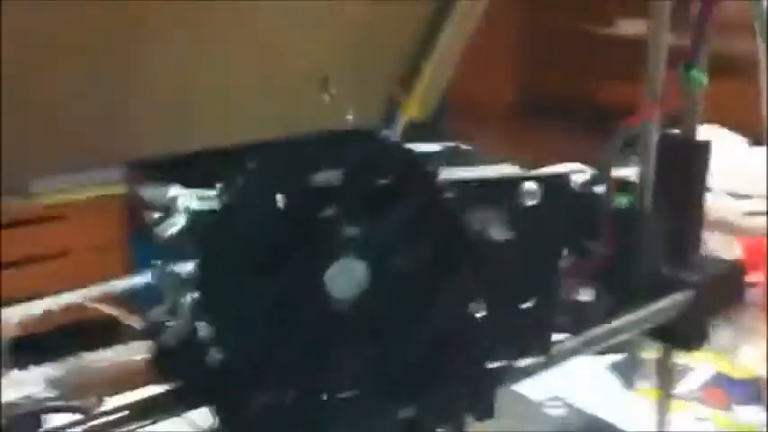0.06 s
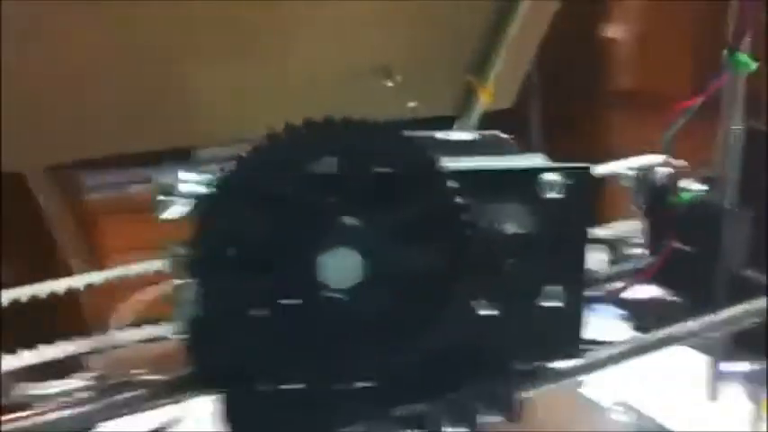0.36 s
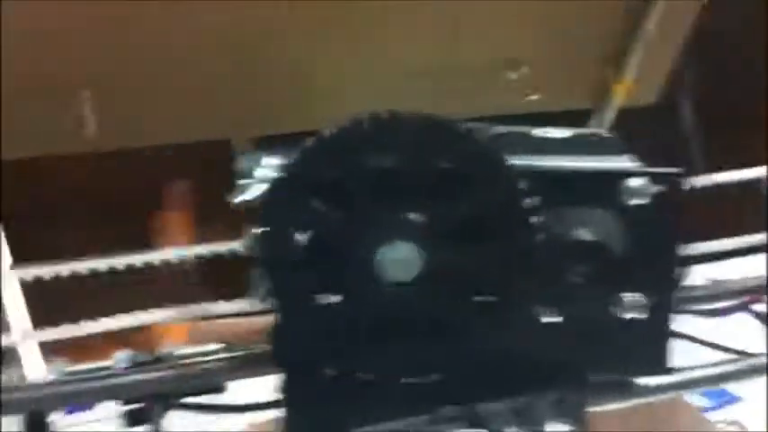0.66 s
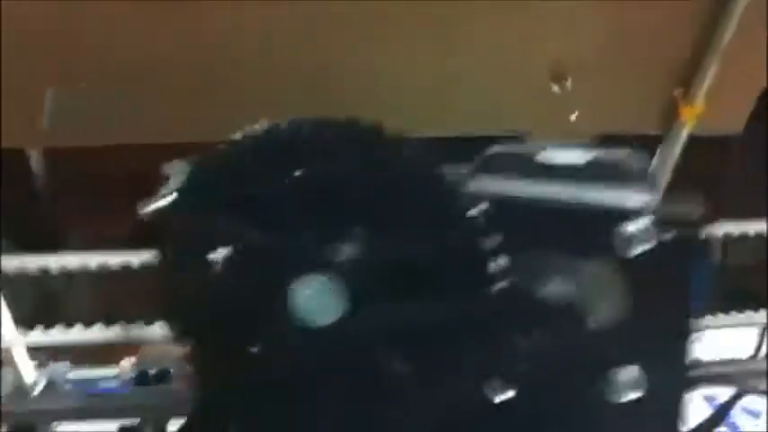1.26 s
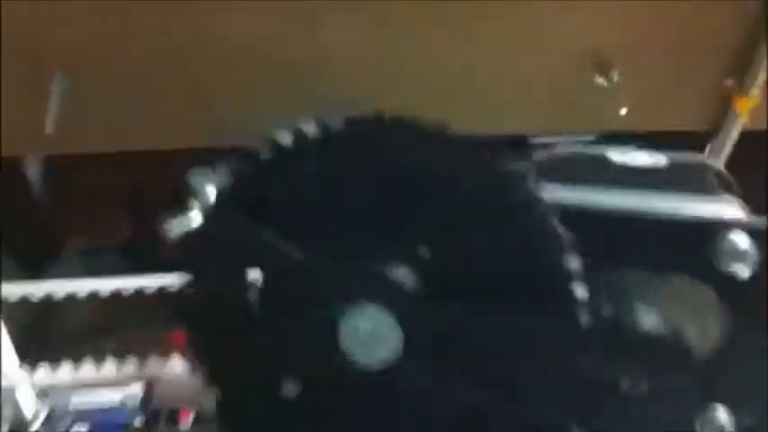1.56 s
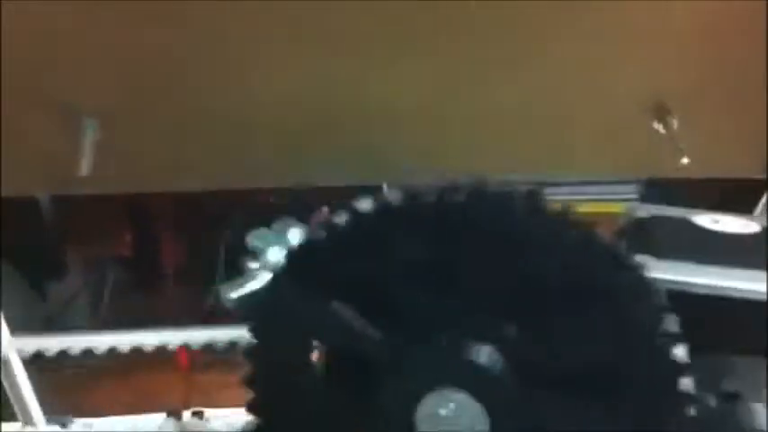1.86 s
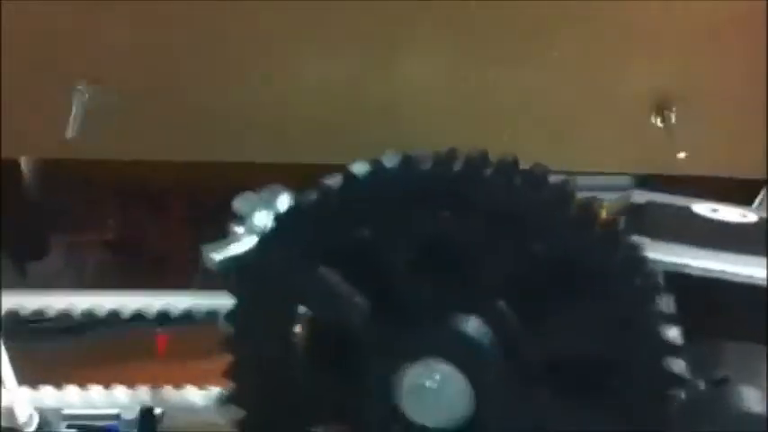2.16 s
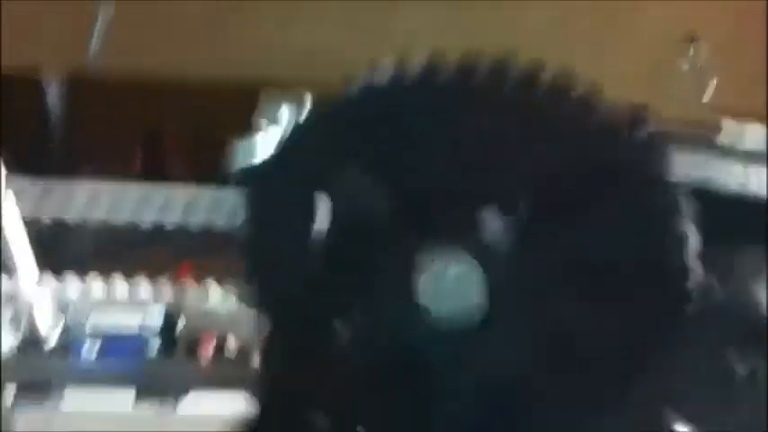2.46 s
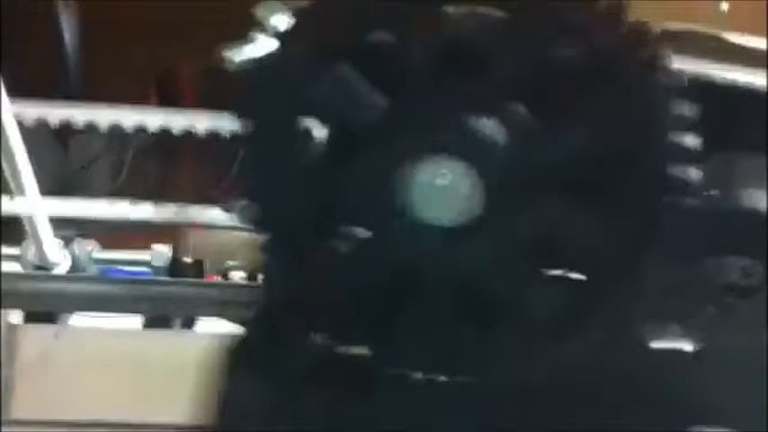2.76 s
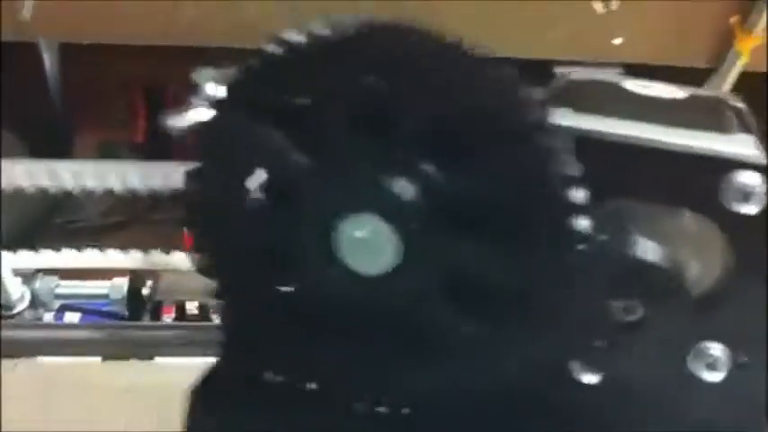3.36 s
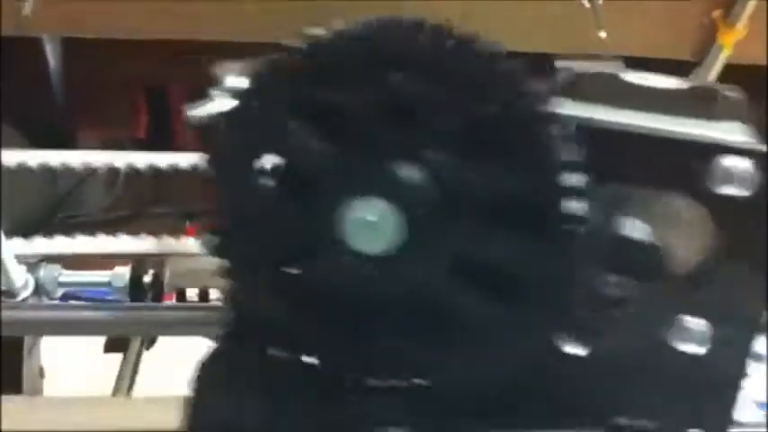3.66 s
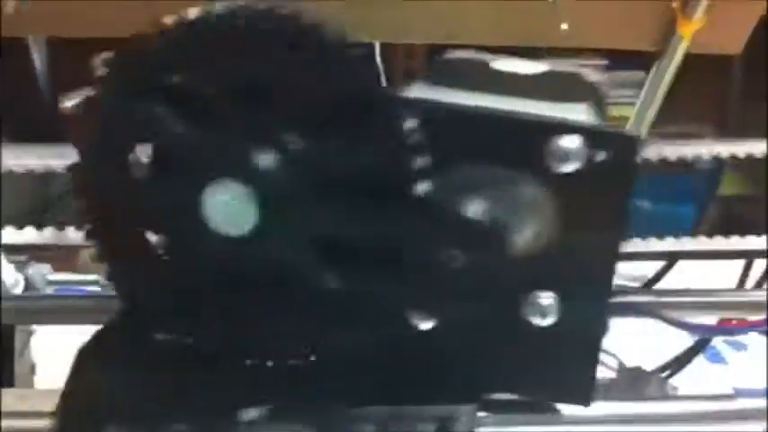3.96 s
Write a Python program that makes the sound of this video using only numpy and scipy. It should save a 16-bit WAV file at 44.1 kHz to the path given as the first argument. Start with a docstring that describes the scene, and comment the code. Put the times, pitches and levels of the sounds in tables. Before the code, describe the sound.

Plastic printer gears tick in a fast, even rhythm before one louder, rattling spin.

```python
"""Low thuds, plastic rattles and sharp clicks, seven beats a second, close by in a small room.
It is the geared filament feeder of a 3D printer being nudged: the motor thuds and shakes the frame,
the teeth collide and ring the wheel and carriage, and now and then the plastic sticks and squeaks.
After a short rub the gears spin fast in one loud burst.
Under it all lie a hum, thin electronic whines and hiss."""
import sys
import numpy as np
from scipy import signal
from scipy.fft import rfft, irfft
from scipy.io import wavfile
from scipy.ndimage import uniform_filter1d

SR = 44100
rng = np.random.default_rng(int(sys.argv[2]) if len(sys.argv) > 2 else 0)


def to_wav(s):
    """Save 16-bit WAV."""
    ch = np.atleast_2d(s).T  # columns
    pcm = np.round(np.clip(ch, -1, 1) * 32767)  # PCM
    wavfile.write(sys.argv[1], SR, pcm.astype(np.int16))


N = 176400
TIME = np.arange(N) / SR
CLICK_DECAY_S = 0.0015

# motor nudges (time [s], relative rattle level [dB], relative thud level [dB], thud pitch [Hz],
# time to thud peak [s], low, middle and high body accents [dB])
NUDGE_CUES = [(0.071, -63.5, -46.5, 181.4, 0.037, -2, -10, 5),
              (0.223, -47.654, -49, 190, 0.013, -2, -15, 2.5), (0.371, -56.5, -52, 182, 0.015, 10, -16, -8),
              (0.518, -52, -50, 180.6, 0.014, -14, -19, -17),
              (0.652, -50.5, -49.5, 171.3, 0.028, 7, -12, 12),
              (0.798, -43.5, -47.5, 195, 0.017, -8, -17, 4), (0.943, -52, -47, 184.5, 0.018, 3, -2, 6),
              (1.084, -48.5, -52, 185, 0.018, -15, -11, -14), (1.224, -46, -47, 172.7, 0.029, 2, -2, -5),
              (1.374, -50.5, -49.7, 212, 0.0055, 5.5, -0.5, -21),
              (1.516, -46.5, -51.5, 179, 0.018, -13, -16, -5),
              (1.652, -43.673, -48.5, 180, 0.0072, -12, 0.5, -11),
              (1.791, -40.5, -43, 172.7, 0.022, -3, -4.5, -6), (1.932, -43, -46, 182, 0.023, -15, -18, -10),
              (2.071, -55, -51, 161, 0.029, -6, -6, 2), (2.216, -45.361, -46.5, 189, 0.022, 7, 5.5, 1),
              (2.361, -46, -51, 190.5, 0.024, 1, 1.5, 6),
              (2.503, -43.5, -51, 184.0, 0.023, -9, -10.5, -0.5),
              (2.646, -51, -49.5, 169.4, 0.02, 13, 4, 1), (2.797, -42.5, -45.4, 201, 0.01, -3, 1.5, 6),
              (2.924, -46.5, -47.5, 191.5, 0.026, -11, -9, -8),
              (3.066, -45.5, -46.5, 178, 0.024, -11, -5, 0),
              (3.216, -83, -50.5, 213.5, 0.031, -1, -6, -8.5)]
# gear rattle during the spin (time [s], relative level [dB])
SPIN_ENVELOPE = [(3.4, -79), (3.416, -58), (3.442, -64), (3.458, -36.5), (3.472, -33), (3.48, -36),
                 (3.49, -32.5), (3.508, -31), (3.512, -34), (3.572, -34.5), (3.578, -37), (3.594, -27),
                 (3.616, -44), (3.624, -34.5), (3.634, -37.5), (3.658, -38), (3.698, -64), (3.762, -50),
                 (3.778, -68), (3.79, -65)]
# bright colour of a struck tooth (frequency [Hz], level [dB])
TOOTH_EQ = [(200, -8.5), (1500, 2.5), (2700, -1.5), (3700, 1.5), (4900, -2), (5800, 2), (6500, 0),
            (7400, 4.5), (9000, 0.5), (10200, -4.5), (11200, -0.5), (13000, -8.5), (16000, -22.5)]
# dark colour of the shaken frame (frequency [Hz], level [dB])
FRAME_EQ = [(25, -23), (60, -44.5), (85, -11), (110, -13), (130, -12.5), (160, 8), (185, -3), (230, -6),
            (300, -12.5), (450, -17.5), (1500, -72)]


def amp(db):
    """Decibels to gain."""
    return 10 ** (np.asarray(db) / 20)


def unit(x):
    """Scales to an rms of one."""
    return x / np.sqrt(np.mean(x ** 2) + 1e-20)


def curve_at(points, hz):
    """Reads a curve along a log-frequency axis."""
    f, value = np.transpose(points)
    return np.interp(np.log(hz + 1), np.log(f + 1), value)


def fader(rows):
    """Gain ride through (time [s], level [dB]) points; silent outside them."""
    return amp(np.interp(TIME, *np.transpose(rows), left=-150, right=-150))


def add(mix, s, sound):
    """Mixes a sound in at s seconds."""
    part = mix[max(round(s * SR), 0):][:len(sound)]
    part += sound[:len(part)]


def drift(size, hz):
    """Random wandering of rms one, mostly slower than hz."""
    f = np.fft.rfftfreq(size, 1 / SR)
    return unit(irfft(rfft(rng.standard_normal(size)) * np.exp(-(f / hz) ** 2), size))


def response(eq, tilt_db=0, size=4096):
    """Minimum-phase impulse response of an EQ curve, tilted per octave from 2 to 11 kHz."""
    f = abs(np.fft.fftfreq(size, 1 / SR))
    octaves = np.log2(np.clip(f, 2000, 11000) / 2000)
    log_gain = np.log(amp(curve_at(eq, f) + tilt_db * octaves))
    h = np.fft.ifft(np.exp(signal.hilbert(log_gain).conj())).real[:size // 2]
    return h / np.linalg.norm(h)


def through(x, h):
    """Passes a sound through an impulse response."""
    return signal.fftconvolve(x, h)[:len(x)]


def impacts(size, per_s):
    """Random tiny collisions of uneven strength."""
    chance, strength, sign = rng.random((3, size))
    strength_db = 3.5 * np.minimum(-np.log(strength + 1e-9), np.pi)
    return unit((chance < per_s / SR) * np.sign(sign - 0.5) * amp(strength_db))


def strike(envelope, h):
    """A swarm of collisions under an envelope rings a response, keeping the envelope's energy."""
    swarm = envelope * impacts(len(envelope), per_s=1600)
    return unit(through(swarm, h)) * np.sqrt(np.mean(envelope ** 2))


def idle():
    """The bed: faintly patchy hiss, the machine's wavering hum and the whine of its electronics."""
    # colour of the hiss (frequency [Hz], level [dB])
    hiss_eq = [(25, -14), (55, -25), (85, -3), (115, -4.5), (160, 1), (230, 5), (330, -1.5), (550, -4.5),
               (800, -9.5), (1050, -6), (1500, -11.5), (2500, -11.5), (4500, -12.5), (5600, -11.5),
               (7500, -19), (9500, -18), (11300, -12.5), (13500, -14), (15300, -18.5), (16000, -13)]
    # hum of the idling machine (pitch [Hz], level [dB], waver [0-1])
    hums = [(173.3, -61, 0.51), (1031, -78.5, 0.9)]
    # electronic whines (pitch [Hz], level [dB], waver [0-1])
    whines = [(5602, -70.5, .45), (15252, -73, .25)]
    bands, _, noise = signal.stft(rng.standard_normal(N), SR, nperseg=2048)
    patches = uniform_filter1d(rng.standard_normal(noise.shape), size=40, axis=0)
    patches = unit(uniform_filter1d(patches, size=6, axis=1))
    hiss_db = curve_at(hiss_eq, bands)[:, None] + 2.17 * patches
    hiss = signal.istft(noise * amp(hiss_db), SR, nperseg=2048)[1][:N]
    out = amp(-56) * unit(hiss)
    for hz, db, waver in hums + whines:
        phase = 2 * np.pi * hz * TIME
        tone = (1 + waver * drift(N, hz=36)) * np.sin(phase)
        flutter = waver * drift(N, hz=14) * np.cos(phase)
        out += amp(db) * unit(tone + flutter)
    return out


def stray_ticks():
    """Loose teeth tick faintly until the spin ends."""
    t = np.arange(SR // 50) / SR
    crack = unit(np.exp(-t / CLICK_DECAY_S) * rng.standard_normal(len(t)))
    ticks = through(through(impacts(N, per_s=60), crack), response(TOOTH_EQ))
    return amp(-68) * unit(ticks) * (TIME < SPIN_ENVELOPE[-1][0])


def gear_body(accents_db=(0, 0, 0)):
    """A blow to the gears: a dull knock and a short ring, accented by where the teeth meet."""
    # resonances of wheel and carriage (frequency [Hz], relative level [dB], t60 [s])
    modes = [(699, -4.5, 0.033), (752, -1.5, 0.069), (1112, 18, 0.033), (1126.4, -1.5, 0.055),
             (1174, -8, 0.033), (1376, -16, 0.043), (1456, -13.5, .045), (1600, -26, 0.083),
             (1504, 9, 0.016)]
    # colour of the knock (frequency [Hz], level [dB])
    knock_eq = [(60, -29), (150, -28), (280, -6.5), (450, -6), (620, -1), (750, 4.5), (900, -0.5),
                (1020, -5.5), (1100, 7), (1230, -7), (1400, 1), (1560, 7), (1750, -9.5), (2100, -4),
                (2600, -17), (3800, -14), (6000, -22), (16000, -19)]
    # centres of the resonance groups (low [Hz], middle [Hz], high [Hz])
    centres = [750, 1100, 1550]
    octaves = np.log2(centres)

    def accent(hz):
        return np.interp(np.log2(hz), [octaves[0] - 1, *octaves, octaves[-1] + 0.5], [0, *accents_db, 0])

    t = np.arange(SR // 5) / SR
    body = amp(-34) * sum(amp(db + accent(hz) - 60 * t / t60) * np.cos(2 * np.pi * hz * t)
                          for hz, db, t60 in modes)
    knock = response([(hz, db + 0.77 * accent(hz)) for hz, db in knock_eq])
    add(body, 0, knock)
    return body / np.linalg.norm(body)


def gear_rattles():
    """At each nudge the teeth rattle and scrape, then knock back lightly as the wheel stops."""
    rise_s, hold_s, fall_db_per_s = 0.006, 0.0092, 475
    backlash_s, backlash_width_s = 0.052, 0.0017
    out, t, tooth = np.zeros(N), np.arange(SR // 5) / SR, response(TOOTH_EQ)
    envelope = np.minimum(t / rise_s, 1) * amp(-fall_db_per_s * np.maximum(t - hold_s, 0))
    envelope += amp(-15.5) * np.exp(-((t - backlash_s) / backlash_width_s) ** 2)
    for s, db, _, _, _, *accents_db in NUDGE_CUES:
        rattle = amp(2.6) * strike(envelope, gear_body(accents_db))
        scrape = amp(-3.5) * strike(envelope, tooth)
        add(out, s, amp(db) * (rattle + scrape))
    return out


def motor_thuds():
    """The motor gives a few low cycles that swell and stop; the frame shudders on."""
    # heavy kick as the spin takes hold (time [s], relative level [dB], pitch [Hz], time to peak [s])
    spin_kick = (3.478, -33, 170, .024)
    rise_s, fall_s, shudder_db_per_s = 0.021, 0.015, 140
    glide_per_s, wobble, overtone_ratio = 1.3, 0.12, 1.635
    out, t, frame = np.zeros(N), np.arange(SR // 5) / SR, response(FRAME_EQ)
    nudges = [(row[0], *row[2:5]) for row in NUDGE_CUES]
    for s, db, hz, peak_s in nudges + [spin_kick]:
        from_peak = t - peak_s
        pitch = hz * (1 + glide_per_s * from_peak + wobble * drift(len(t), hz=52.4))
        phase = 2 * np.pi * (np.cumsum(pitch) / SR + rng.random())
        width_s = np.where(from_peak < 0, rise_s, fall_s)
        swell = np.exp(-(from_peak / width_s) ** 2) * np.minimum(t / 0.0013, 1)
        tone = np.sqrt(2) * swell * (np.sin(phase) + amp(-24.5) * np.sin(overtone_ratio * phase))
        shudder = strike(amp(-shudder_db_per_s * t), frame)
        add(out, s, amp(db + 3.5) * tone + amp(db - 4) * shudder)
    return out


def tooth_clicks():
    """A tooth snaps against its neighbour: a bright crack with a little gear body behind it."""
    # tooth snaps (time [s], relative level [dB], treble tilt [dB/octave])
    snaps = [(0.0873, -51, -2), (0.2253, -45, 0), (0.2304, -51, -2), (0.37, -68, -12), (0.3743, -47, -0.5),
             (0.3885, -58, 12), (0.6565, -44.5, 5), (0.6723, -44.5, 2), (0.8003, -51, -3),
             (0.8083, -41.5, -4.5), (0.8208, -44.5, 1), (0.8284, -49, -10), (0.945, -41.5, -1.5),
             (0.9535, -44.5, -5), (0.964, -42.5, 4), (1.0868, -48, -4), (1.106, -42, 6.5),
             (1.2283, -41.5, 1), (1.2468, -44, 8), (1.2729, -45, 1.5), (1.3751, -56, 9), (1.407, -48, 1),
             (1.4962, -48.5, 1), (1.5208, -43, -2), (1.5336, -43.5, -1), (1.555, -41.5, -1.5),
             (1.576, -43, 2.5), (1.6528, -46.5, -2), (1.6727, -43, -2), (1.7133, -48, -4), (1.7944, -41, 7),
             (1.8118, -48, 16), (1.9379, -34, 3.5), (2.1089, -49, 4), (2.2413, -44, -1), (2.265, -41, 2.5),
             (2.3487, -51, 7), (2.3783, -37, 11), (2.4091, -41.5, 0.5), (2.5, -66, 2), (2.5233, -41, 15),
             (2.526, -40, -1.5), (2.5484, -44, 5), (2.639, -52, 7), (2.6716, -44.5, 1.5),
             (2.7934, -32.5, 1), (2.8118, -61, 7), (2.8372, -44.5, 1), (2.926, -38.5, 1),
             (2.947, -41.5, -0.5), (2.9743, -44, 2.5), (2.9935, -49, 2), (3.0866, -40, 5),
             (3.113, -44.5, 3), (3.3358, -49.5, 0), (3.463, -38.5, -4.5), (3.4683, -30, 16),
             (3.4865, -35, 28), (3.4946, -35.5, 0), (3.5419, -36.5, 17), (3.5916, -45, 6),
             (3.633, -33.5, -0.5), (3.6528, -33.5, -3.5)]
    rise_s, tail_s, eq_spread_db = 0.00091, 0.005, 2.5
    out, t = np.zeros(N), np.arange(SR // 10) / SR
    decay = np.exp(-t / CLICK_DECAY_S) + amp(-13) * np.exp(-t / tail_s)
    for s, db, tilt_db in snaps:
        crack = np.minimum(t / rise_s, 1) * decay * rng.standard_normal(len(t))
        eq = [(hz, band_db + eq_spread_db * rng.standard_normal()) for hz, band_db in TOOTH_EQ]
        snap = through(crack, response(eq, tilt_db))
        body = amp(-15.5) * through(crack, gear_body())
        add(out, s, amp(db + 6.5) * (snap + body))
    return out


def plastic_squeaks():
    """Plastic sticks and slips for a few milliseconds with a rough pitch."""
    # slips of the plastic (time [s], pitch [Hz], level [dB])
    slips = [(1.155, 2900, -52), (1.389, 3600, -53.5), (2.411, 3400, -54), (3.110, 3700, -44),
             (3.251, 4000, -57), (3.336, 3950, -41.5)]
    width_s, roughness = 0.0018, 0.066
    out, t = np.zeros(N), np.arange(-0.02, 0.02, 1 / SR)
    envelope = np.exp(-(t / width_s) ** 2)
    for s, hz, db in slips:
        pitch = hz * (1 + roughness * drift(len(t), hz=800))
        phase = 2 * np.pi * np.cumsum(pitch) / SR
        add(out, s + t[0], amp(db) * np.sqrt(2) * np.sin(phase) * envelope)
    return out


def rub():
    """A soft, fine-grained slide leads into the spin."""
    # swell of the rub (time [s], level [dB])
    swell = [(3.25, -79), (3.283, -45.5), (3.32, -46), (3.345, -65), (3.365, -78)]
    # colour of the rub (frequency [Hz], level [dB])
    rub_eq = [(200, -4), (800, 1.5), (1700, -1.5), (2600, -1), (4000, -0.5), (6000, -5), (9000, -11.5),
              (12000, -6), (16000, -14)]
    return fader(swell) * through(impacts(N, per_s=9000), response(rub_eq))


def gear_spin(layers=4):
    """The gears run fast: dense collisions ring the body and shake the frame, and the teeth tick."""
    # rumble of the frame (time [s], level [dB])
    rumble_ride = [(3.44, -60), (3.482, -34), (3.502, -36), (3.516, -37), (3.56, -50), (3.6, -40.5),
                   (3.66, -44.5), (3.69, -50), (3.74, -62)]
    # ticking of the teeth (time [s], level [dB])
    tick_ride = [(3.40, -86), (3.42, -47.5), (3.445, -59), (3.462, -47), (3.49, -37.5), (3.51, -53.5),
                 (3.58, -48.5), (3.6, -44), (3.66, -47), (3.68, -54.5), (3.78, -72)]

    def clatter(h, per_s=900):
        return unit(through(impacts(N, per_s), h))

    ticks, t = np.zeros(N), np.arange(SR // 50) / SR
    for _ in range(layers):
        crack = np.exp(-t / CLICK_DECAY_S) * rng.standard_normal(len(t))
        ticks += clatter(through(crack, response(TOOTH_EQ)), per_s=460 / layers)
    rattle = amp(-1.34) * unit(sum(clatter(gear_body()) for _ in range(layers)))
    rumble = clatter(response(FRAME_EQ))
    return fader(SPIN_ENVELOPE) * rattle + fader(rumble_ride) * rumble + fader(tick_ride) * unit(ticks)


def room(x):
    """The small room answers with a short diffuse tail whose top end dies first."""
    # room decay (frequency [Hz], t60 [s])
    decay_times = [(150, 0.41), (1000, 0.39), (5000, 0.51), (15000, 0.11)]
    hz, t, noise = signal.stft(rng.standard_normal(SR // 2), SR, nperseg=256)
    decay = amp(-60 * t / curve_at(decay_times, hz)[:, None])
    fade_in = np.minimum(t / 0.015, 1)
    tail = signal.istft(noise * decay * fade_in, SR, nperseg=256)[1]
    return through(x, tail / np.linalg.norm(tail))


def scene():
    """Gears and motor up front with a little room, over the idling machine; mono."""
    gears = gear_rattles() + tooth_clicks() + gear_spin() + rub() + plastic_squeaks() + stray_ticks()
    motor = motor_thuds()
    reverb = room(amp(-17) * gears + amp(-15) * motor)
    return (gears + motor + reverb + idle())[None]


def record(dry):
    """A steep low-pass trims the very top of the treble."""
    lowpass = signal.firwin(511, cutoff=15850, window=("kaiser", 9), fs=SR)
    return signal.oaconvolve(dry, lowpass[None], "same")


dry = scene()
out = record(dry)
to_wav(out)
```